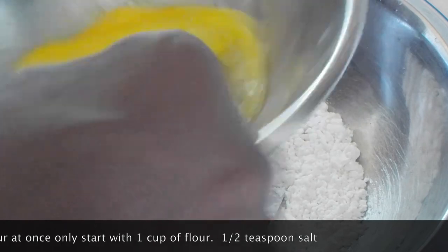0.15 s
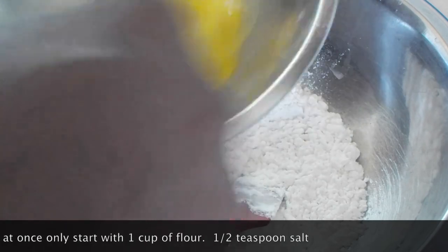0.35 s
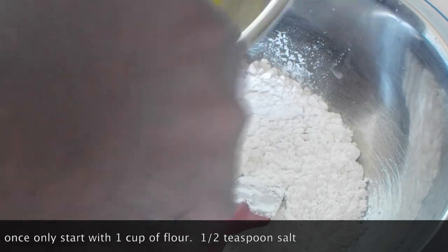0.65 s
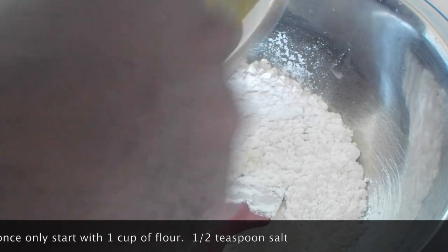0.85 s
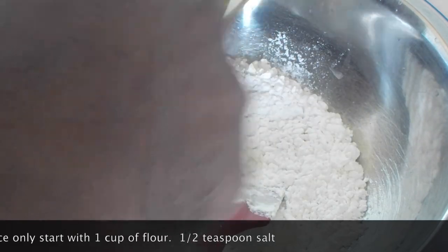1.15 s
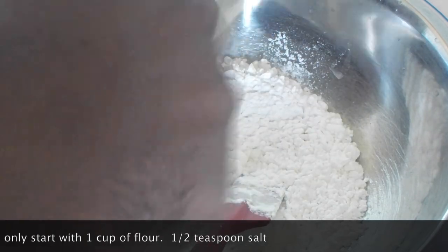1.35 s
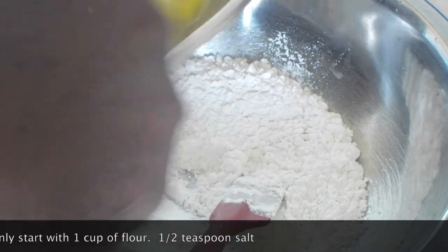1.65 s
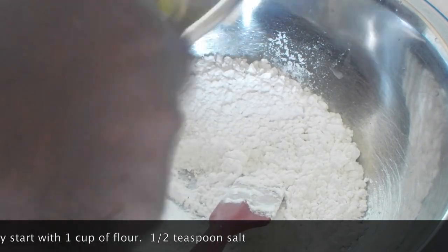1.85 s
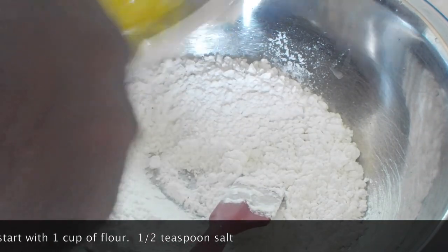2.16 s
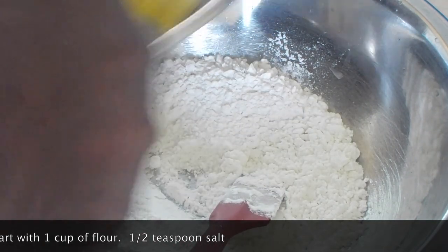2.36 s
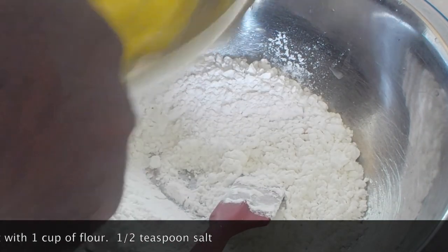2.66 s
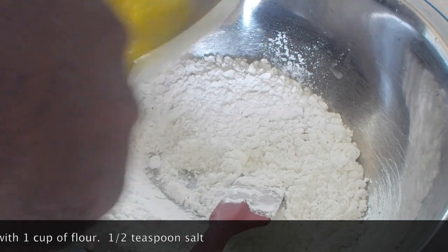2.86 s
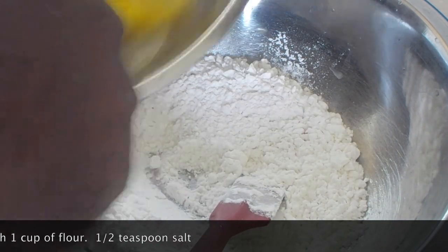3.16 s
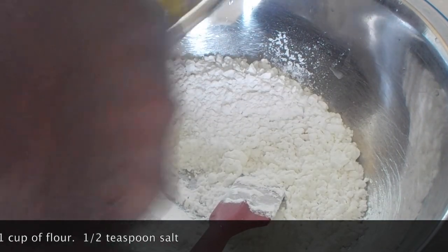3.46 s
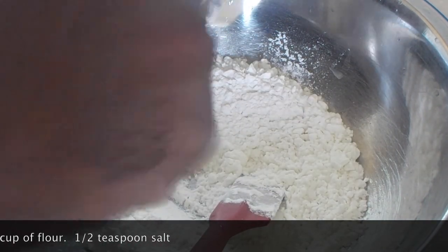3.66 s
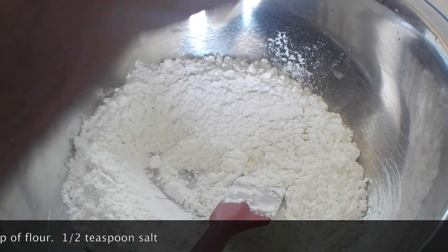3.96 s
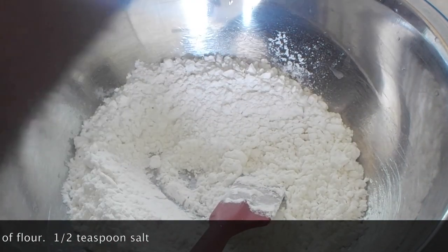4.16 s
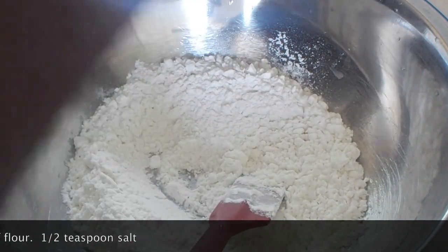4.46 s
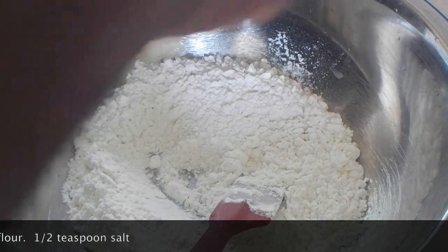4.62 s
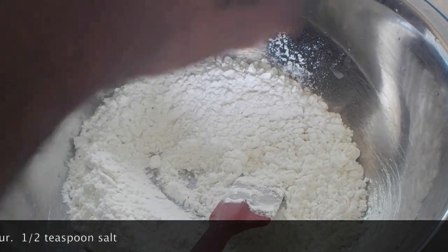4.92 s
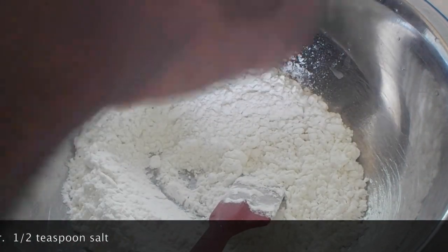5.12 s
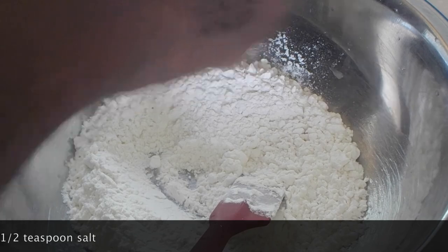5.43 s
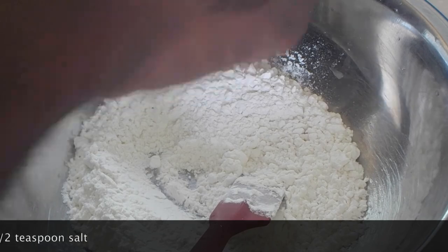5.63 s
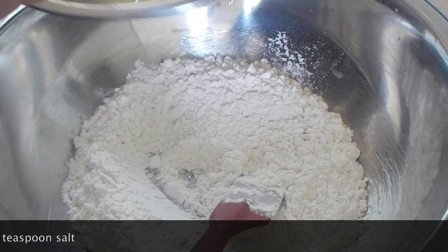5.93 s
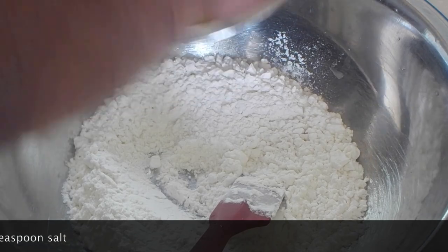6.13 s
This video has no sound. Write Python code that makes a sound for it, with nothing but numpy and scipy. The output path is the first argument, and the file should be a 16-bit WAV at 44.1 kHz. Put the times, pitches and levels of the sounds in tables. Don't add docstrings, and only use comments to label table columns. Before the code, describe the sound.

A fork rapidly beats eggs in a small steel bowl, scraping and clacking in quick even strokes with wet plopping slaps, close up.

```python
import sys
import numpy as np
from scipy import signal
from scipy.fft import rfft, irfft
from scipy.io import wavfile

SR = 44100
rng = np.random.default_rng(int(sys.argv[2]) if len(sys.argv) > 2 else 0)


def natural_amplitude(level_db):
    exponent = np.asarray(level_db, float) / 20
    return 10 ** exponent


def wav_out(sig):
    wavfile.write(sys.argv[1], SR, np.round(np.clip(np.atleast_2d(sig).T, -1, 1) * 32767).astype(np.int16))


N = 277256
PORTS = np.array([[1], [-1]])

# (landing_s, rise_to_full_speed_s,
# full_speed_hiss_db, egg_load_db, depth_db)
STROKES = [(0.0, 0.022, -24.5, 6, -10.5), (.143, 0.058, -31.5, 2, -5), (.315, .066, -32.5, 1.5, 4),
           (.485, 0.05, -27, 0, -7), (.66, 0.049, -30.5, 0.5, 5.5), (.829, 0.051, -29.5, 0, 7),
           (1.002, 0.05, -31, 1.5, 6.5), (1.181, 0.053, -27, -.5, 2), (1.349, 0.05, -28, 4, 3.5),
           (1.516, 0.046, -25.5, 4, -0.5), (1.692, 0.043, -28, 3, -2), (1.868, 0.042, -25, 5.5, -0.5),
           (2.035, 0.062, -31.5, 6.5, 8), (2.214, 0.051, -31, 4.5, -1), (2.393, 0.049, -30.5, 6, -8),
           (2.567, .045, -27, 7, 0), (2.747, 0.033, -30, 12, 0.5),
           (2.92, 0.044, -29, 8, 7), (3.103, 0.051, -29, 5.9, -2.5), (3.286, 0.053, -32.5, 5.3, 8),
          (3.468, 0.049, -29, 5, 1), (3.655, 0.052, -33, 10.9, 3), (3.838, 0.057, -31.5, 6.1, 2.5),
          (4.028, 0.051, -31, 8.6, 1), (4.214, 0.058, -31.5, 11.4, -19.5), (4.397, 0.049, -34, 11.4, 1),
          (4.571, 0.046, -29.5, 6.4, -21.5), (4.754, .052, -31, 8.7, -10.5), (4.935, 0.052, -31.5, 10.8, 3),
          (5.116, 0.048, -30, 6.7, -7), (5.294, 0.051, -28, 10.6, -11), (5.463, 0.044, -28.5, 5.7, -4),
          (5.634, 0.033, -32.5, 9, -2)]
BEATS = STROKES
HARD = {0: 6.5, 2: 4.4, 3: 9, 12: 7.5, 16: 3, 31: 2.9}
# (start_s, tick_db, ring_db, ring_hz)
CLACKS = [(.172, -16.5, -42.5, 1600), (0.3751, -12, -21.5, 1627), (0.5363, -24, -17.5, 1920),
          (.712, -15.5, -35, 1770), (1.0234, -21.5, -43, 1680), (1.233, -32.5, -47, 1730),
          (1.3923, -25.5, -37, 1790), (1.563, -14.5, -28.5, 1557), (1.7327, -17.5, -21, 1664),
          (1.911, -15, -14.5, 1736), (2.2623, -12, -13, 1770), (2.4352, -22, -36.5, 1660),
          (2.6067, -6, -33, 1730), (2.7567, -13, -26.5, 1490), (2.7775, -19.5, -14, 1685),
          (2.9603, -18.5, -23.5, 1596), (3.1455, -11, -20.5, 1724), (3.3298, -12.5, -18.5, 1564),
          (3.518, -24, -19.5, 1720), (3.689, -22.5, -21, 1680), (4.0718, -22, -27, 1670),
          (4.2595, -22, -20, 1460), (4.4418, -23, -21, 1705), (4.6212, -19, -16, 1700),
          (4.801, -16.5, -20, 1745), (4.979, -15, -16, 1788), (5.161, -21, -18.5, 1754),
          (5.316, -21.5, -36.5, 1670), (5.3324, -16.5, -12.5, 1735), (5.674, -16, -14.5, 1840)]


def unit(x):
    return x / np.sqrt(np.mean(x ** 2))


def curve_db(table, hz):
    f, db = np.transpose(table)
    return np.interp(np.log(np.maximum(hz, 1)), np.log(f), db)


def add(track, start_s, piece):
    i = max(int(start_s * SR), 0)
    track[i:i + len(piece)] += piece[:len(track) - i]


def walk(rate_hz):
    levels = rng.standard_normal(2048)
    return unit(np.interp(np.arange(N) / SR * rate_hz, np.arange(len(levels)), levels))


def grit(rate_hz, spread_db):
    chance, polarity, size = rng.random((3, N))
    clicks = (chance < rate_hz / SR) * np.sign(polarity - .5)
    return unit(clicks * natural_amplitude(-spread_db * np.log(1 - .999 * size)))


def ring(x, modes, patchy_db):
    out = 0
    for k, (hz, width_hz, db) in enumerate(modes):
        r = np.exp(-np.pi * abs(width_hz) / SR)
        poles = [1, -2 * r * np.cos(2 * np.pi * hz / SR), r * r]
        fed = x * natural_amplitude(db + patchy_db * (walk(45.) + 0.53 * walk(9.)))
        gain = (-1) ** k * np.sqrt((1 - r * r) / 2 / len(modes))
        out = out + gain * signal.lfilter([1, 0, -1], poles, fed)
    return out


def pressure(colour_db, land_ms, lead_db, bend, stretch):
    drag = {0: 0.8, 1: 1.26, 2: 0.84, 4: 1, 7: 1, 16: 1.2, 30: 0.99, 32: 0.97}
    touch_db, fade_s = -45, 0.056
    out = np.zeros(N)
    t = np.arange(int(.22 * SR)) / SR
    swell = 1 - np.exp(-(t * 1000 / land_ms) ** 2)
    for k, ((start_s, rise_s, full_db, *_), db) in enumerate(zip(BEATS, colour_db)):
        landing_db = min(touch_db + HARD.get(k, 0) + lead_db, full_db)
        up = np.interp(t, [0, rise_s + 0.0075], [landing_db, full_db])
        fading_s = np.maximum(t - rise_s - .003, 0)
        down = -20 * (fading_s / (fade_s * stretch * drag.get(k, 1))) ** bend
        add(out, start_s - .003, natural_amplitude(up + down + db) * swell)
    return out


def wall():
    # (mode_hz, width_hz, level_db)
    wall_modes = [
        [(295, 250, -6), (450, 120, -2), (591, 86, -2.5)],
        [(699, 53, -4), (780, 34, -0.5), (850, 21, 1.5)],
        [(942, 120, -0.5), (1030, 35, -1), (1130, 57, -3.5), (1244, 65, -2.5)],
        [(1409, 91, -2.5), (1531.6, 48, -5), (1586, 43, -2.5), (1686, 56, -1.5), (1770, 50, 0.5),
         (1874, 49, -4), (1990, 180, 0.5)],
    ]
    follow = [
        (.2, .6),
        (.95, 1),
        (.95, 0.35),
        (.99, .01),
    ]
    group_db = [-10.5, -16, -7.5, -3]
    out = 0
    load_db, depth_db = np.transpose(BEATS)[3:]
    for modes, (load_share, depth_share), db in zip(wall_modes, follow, group_db):
        colour_db = load_share * load_db + depth_share * depth_db + db
        push = pressure(colour_db, land_ms=2.0, lead_db=7.5, bend=1.09, stretch=1.0)
        chatter = grit(2000, 1.98) * natural_amplitude(1.57 * walk(90.))
        out = out + ring(chatter * push, modes, patchy_db=3.5)
    return out


def tines():
    # (mode_hz, width_hz, level_db)
    tine_modes = [(2632, 280, 0), (3480, 410, -6.5), (3970, 570, -3.5), (4590, 430, 0), (5360, 360, -2.5),
                  (5880, 660, -2), (6460, 372, 1.5), (7010, 750, 3.5)]
    # (mode_hz, width_hz, level_db)
    spray_modes = [(8180, 520, 0.0043), (9040, 600, 0.015), (10300, 1400, 0.0028)]
    # (start_s, length_s, level_db)
    swishes = [(0.129, 0.013, -47.5), (0.265, 0.041, -55), (.475, 0.0065, -47), (1.158, 0.035, -52),
               (1.33, .02, -55), (2.191, .03, -47.5), (2.526, 0.053, -49.5), (3.091, .015, -58),
               (3.633, 0.041, -62), (3.802, 0.054, -51.5), (4.535, 0.016, -54.5)]
    even_db = np.zeros(len(BEATS))
    scatter_db = 4.5 * rng.standard_normal(len(BEATS))
    landings = [(beat[0], -36 + HARD.get(k, 0) + scatter_db[k]) for k, beat in enumerate(BEATS)]

    ragged = natural_amplitude(1.5 * walk(310.) + 1.07 * walk(55.))
    low = pressure(even_db, land_ms=0.71, lead_db=-0.2, bend=1.64, stretch=1.033) * ragged
    top = pressure(even_db + 0.27, land_ms=.8, lead_db=-3.7, bend=1.82, stretch=0.98) * ragged
    froth = pressure(even_db - .3, land_ms=4.3, lead_db=1.5, bend=1.5, stretch=0.96)
    froth = froth * natural_amplitude(2.0 * walk(130.0))

    blows = np.zeros(N)
    t = np.arange(int(.07 * SR)) / SR
    tick = np.exp(-t / 0.0053) + 1.5 * np.exp(-t / 0.00043)
    for start_s, db, *_ in landings + CLACKS:
        add(blows, start_s, natural_amplitude(db - 11.5) * tick)
    for start_s, length_s, db in swishes:
        add(froth, start_s, natural_amplitude(db + 12.5) * np.sin(np.pi * np.clip(t / length_s / 1.26, 0, 1)))

    half = len(tine_modes) // 2 + 1

    def rung_tines(steel):
        lower = ring(steel * (low + blows), tine_modes[:half], patchy_db=2.5)
        upper = ring(steel * (top + blows), tine_modes[half:], patchy_db=2.0)
        return lower + 0.75 * upper

    def spray():
        return ring(grit(11000, 1.3) * (froth + 0.79 * blows), spray_modes, patchy_db=3.5)

    mid, side = rung_tines(grit(9000, 1.8)), rung_tines(grit(9000, 1.6))
    high, apart = spray(), spray()
    fork = natural_amplitude(9.5) * (mid + natural_amplitude(-8.0) * side * PORTS)
    return fork + natural_amplitude(4.5) * (high + natural_amplitude(-2.0) * apart * PORTS)


def small_bubbles():
    rows = np.repeat(BEATS, 2, axis=0)
    a, b, c, d = rng.standard_normal((len(rows), 4)).T
    landing_s, rise_s, hiss_db, load_db, _ = rows.T
    start_s = landing_s + rise_s + .022 * np.tanh(a)
    peak_db = hiss_db + load_db - 5.5 + 2.0 * b
    pitch_hz = 1302 * np.exp(.22 * c)
    length_ms = 2.5 * np.exp(.6 * d)
    return list(zip(start_s, peak_db, pitch_hz, length_ms))


def plops():
    # (start_s, peak_db, pitch_hz, length_ms)
    soft_slaps = [
        (.002, -24.5, 914, 14.6),
        (2.793, -21, 1020, 5),
        (.131, -37.5, 850, 8),
        (0.477, -58, 1100, 5),
        (1.163, -34, 962, 10),
        (5.131, -30.5, 1130, 20),
    ]
    # (start_s, peak_db, pitch_hz)
    knocks = [
        (0.029, -19.5, 1410),
        (2.0389, -7, 1270),
        (2.7994, -8.5, 1020),
        (3.334, -6, 1440),
        (4.9337, -4, 1400),
    ]
    # (start_s, peak_db, pitch_hz, length_ms)
    pockets = [(.032, -11, 1385, 2.6), (.174, -30.5, 1060, 1.1), (.864, -23.5, 904, 1.7),
               (.871, -13, 830, 2.6), (1.039, -25, 905, 11), (1.181, -22, 1090, 0.83),
               (1.385, -25, 977, 6.2), (2.038, -19, 1283, 2.), (2.063, -18.5, 960, 10),
               (2.277, -18.5, 977, 14), (2.421, -21, 1260, 3.3), (2.604, -25.5, 962, 6),
               (2.8, -8.5, 1107, 2.7), (2.801, -14, 813, 21), (2.826, -19.5, 750, 8.3),
               (2.983, -21, 780, 5.4), (3.149, -20, 780, 18.3), (3.318, -18.5, 728, 11.6),
               (3.326, -17.5, 918, 10), (3.528, -16, 838, 24.6), (3.702, -22.5, 1315, 16),
               (3.712, -23, 1045, 1.8), (3.897, -17, 940, 0.76), (4.051, -16.5, 927, 7),
               (4.067, -19, 1030, 7.5), (4.081, -21.5, 1060, 2.2), (4.963, -16.5, 768, 5.5),
               (5.331, -11.5, 1070, 3.4), (5.383, -18.5, 986, 15.6), (5.703, -17.5, 997, 13)]
    # (start_s, peak_db, pitch_hz, length_ms)
    upper_slaps = [(.211, -26, 1636, 19.3), (0.504, -21.5, 1454, 6.5), (.69, -25, 1708, 15),
                   (1.073, -22.5, 1700, 3.2), (1.401, -17, 1795, 4.4), (2.097, -14, 1696, 8.1),
                   (2.108, -19.5, 1690, 1.8), (2.455, -30, 1646, 16), (2.617, -12.5, 1786, 1.3),
                   (2.881, -25, 1320, 12), (3.488, -23, 1624, 17), (4.237, -25.5, 1720, 3.5),
                   (4.54, -17.5, 1770, 8.5), (4.932, -12.5, 1663, 2.2), (5.509, -30, 1654, 9),
                   (5.703, -19, 1660, 2.)]
    ring_lag_s, ring_ms = 0.003023, 7.5
    clack_rings = [(start_s + ring_lag_s, db, hz, ring_ms) for start_s, _, db, hz in CLACKS]
    slaps = pockets + upper_slaps + soft_slaps + clack_rings + small_bubbles()

    out = np.zeros(N)
    chance = rng.standard_normal((len(slaps), 2))
    t = np.arange(int(.09 * SR)) / SR
    for (start_s, db, hz, ms), (detune, offset) in zip(slaps, chance):
        life_s = 1.05 * max(ms, .5) / 1000 + 0.00088
        shape = (1 - np.exp(-(t / 0.0015) ** 2)) * np.exp(-(t / life_s) ** 1.07)
        phase = 2 * np.pi * hz * (t + 0.31 * t ** 2)
        tone = np.sin(phase) + 0.67 * np.sin(phase * (1 + 0.079 * detune) + offset)
        add(out, start_s - .0016, natural_amplitude(db - 1.63) * tone * shape / shape.max())
    out = out * natural_amplitude(2.5 * walk(300.))
    for start_s, db, hz in knocks:
        cycles = (t - .003) * hz
        add(out, start_s - .0035, natural_amplitude(db) * np.cos(2 * np.pi * cycles) * np.exp(-(cycles / 0.64) ** 2))
    return out


def kitchen():
    # (frequency_hz, density_db_per_hz)
    air_colour = [(60, -2), (200, -2), (300, 3), (500, 2), (900, -2.5), (1800, -13), (3000, -12.5),
                  (5000, -16), (7500, -21), (10000, -19.5), (20000, -21)]
    gain = natural_amplitude(curve_db(air_colour, np.fft.rfftfreq(N, 1 / SR)))
    mid, side = (unit(irfft(rfft(rng.standard_normal(N)) * gain, N)) for _ in range(2))
    swelling = natural_amplitude(-54.5 + 0.9 * walk(23.0) + 1.3 * walk(35.0))
    return swelling * (mid + natural_amplitude(-18.0) * side * PORTS)


def room(x):
    level_db, t60_s, top_hz = -16, 0.17, 3080
    t = np.arange(16384) / SR
    tails = rng.standard_normal((2, len(t))) * natural_amplitude(-60 * t / t60_s) * (t > .002)
    tails = tails / np.sqrt(np.sum(tails ** 2, axis=1, keepdims=True))
    dull = signal.lfilter(*signal.butter(1, top_hz, fs=SR), x)
    return natural_amplitude(level_db) * signal.fftconvolve(dull[None], tails, axes=1)[:, :N]


def scene():
    bowl, fork = wall() + plops(), tines()
    direct = natural_amplitude(-.9 * PORTS) * (bowl + kitchen()) + natural_amplitude(-.35 * PORTS) * fork
    return direct + room(bowl + fork.mean(axis=0))


def low_pass(x):
    return signal.sosfilt(signal.butter(12, 11490, fs=SR, output="sos"), x)


def record(dry):
    # (frequency_hz, gain_db)
    mic_curve = [(40, -39), (200, -29), (400, -19), (700, -1.5), (1800, 0), (2200, -8), (2700, -20),
                 (4000, -15.5), (4700, -10.5), (7200, -10.5), (8500, -24.5), (10800, -27.5), (11300, -53.5),
                 (20000, -70)]
    # (centre_hz, width_hz, gain_db)
    housing = [(355.7, 15, 9), (450, 13, 10.5), (539, 9.9, 7), (704, 6.9, 6), (767, 15, 5), (961, 10, 6.5),
               (1129, 13, 7.5), (1538, 16, 7), (2437, 112.5, -33.5), (2996, 58, -29), (8070, 233, -22)]
    size = 8192
    hz = np.fft.rfftfreq(size, 1 / SR)
    db = curve_db(mic_curve, hz) + sum(d / (1 + ((hz - f) / w) ** 2) for f, w, d in housing)
    cepstrum = irfft(np.log(natural_amplitude(db)), size)
    cepstrum[1:size // 2] *= 2
    cepstrum[size // 2 + 1:] = 0
    response = irfft(np.exp(rfft(cepstrum)), size)
    x = signal.fftconvolve(dry, response[None], axes=1)[:, :N]
    x = x + 0.0055 * x ** 2
    return low_pass(x)


dry = scene()
out = record(dry)
wav_out(out)
```